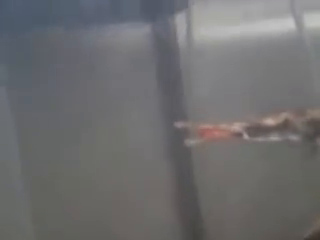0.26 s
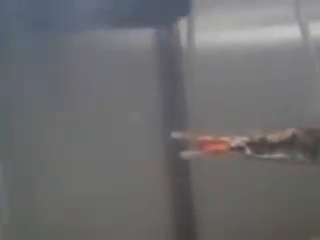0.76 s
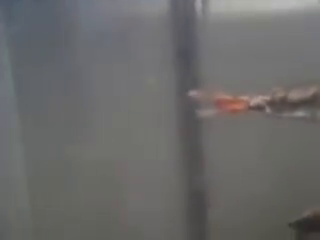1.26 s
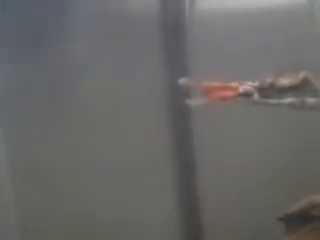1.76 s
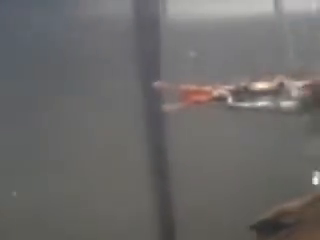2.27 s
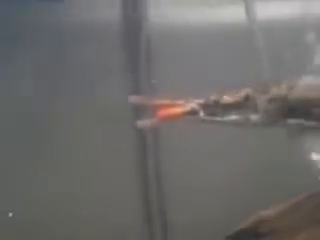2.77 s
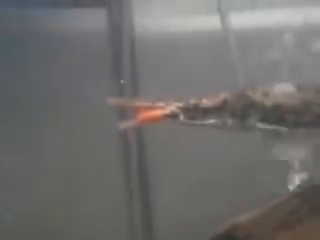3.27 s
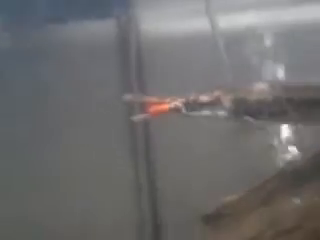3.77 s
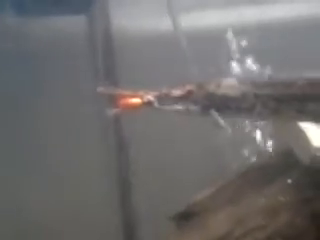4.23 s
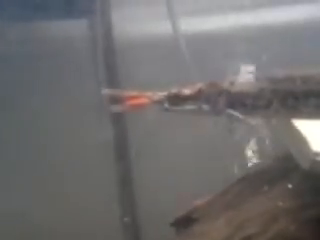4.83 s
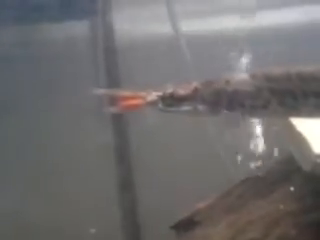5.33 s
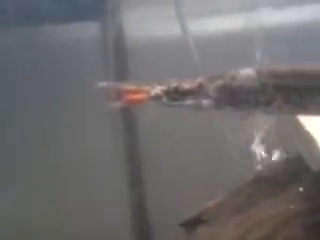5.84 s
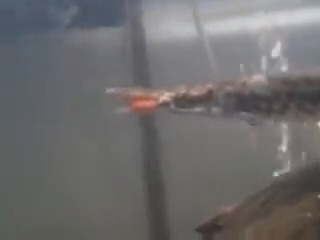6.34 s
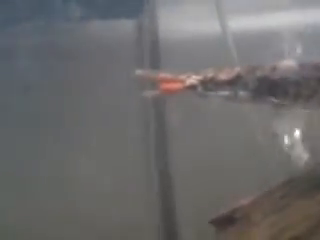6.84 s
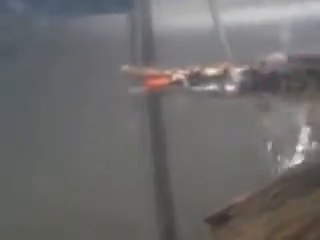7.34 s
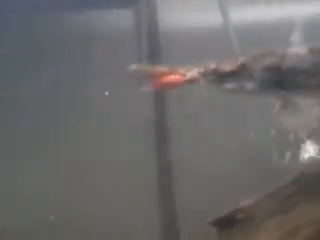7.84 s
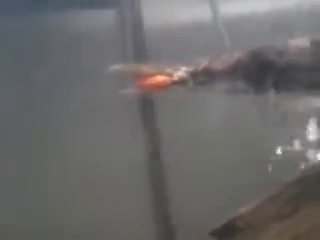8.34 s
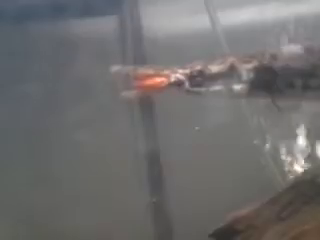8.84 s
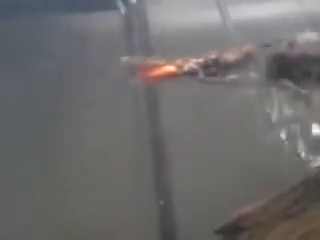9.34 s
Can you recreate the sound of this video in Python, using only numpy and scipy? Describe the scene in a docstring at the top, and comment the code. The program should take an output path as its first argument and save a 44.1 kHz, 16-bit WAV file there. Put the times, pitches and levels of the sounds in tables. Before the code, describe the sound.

Close handling noise opens: gritty finger rubbing and hard, clipped ticks on a plastic microphone casing for about one second. Bright water then trickles and bubbles into an aquarium, with rising plips and crisp little splashes over a quiet pump hum. One loud knock interrupts at about seven seconds. The small room is close and slightly reverberant; water is clearer on the left, dull and faint on the right.

```python
"""Fingers rub and tick on the plastic casing of the microphones, hard enough to overload the input.
Under them and after them filter water trickles into an aquarium in a small room: bubbles are dying
sines that climb in pitch, drops are puffs of bright noise, the stream is a fizz of small resonances.
Behind it the pump hums in mains harmonics over filtered-noise rumble.
The water is nearer the left microphone; the hand shades the right one."""
import sys
import numpy as np
from scipy import signal
from scipy.fft import rfft, irfft
from scipy.io import wavfile

SR = 44100
rng = np.random.default_rng(int(sys.argv[2]) if len(sys.argv) > 2 else 0)


def int16_out(signal):
    """Quantize to a 16-bit WAV file."""
    q = np.round(np.clip(np.atleast_2d(signal).T, -1, 1) * 32767)
    wavfile.write(sys.argv[1], SR, q.astype(np.int16))


N = 423360


def from_db(db):
    """Amplitude gain of a level in dB."""
    return 10 ** (np.asarray(db) / 20)


def rms_one(x):
    """Scale to rms 1."""
    return x / np.sqrt(np.mean(x ** 2) + 1e-20)


def in_time(rows):
    """Gain at every sample from rows of (t/s, level/dB)."""
    t_s, level_db = np.transpose(rows)
    return from_db(np.interp(np.arange(N) / SR, t_s, level_db))


def colour(x, points):
    """Filter by a spectrum of (f/Hz, level/dB), interpolated over log frequency."""
    f_hz, level_db = np.transpose(points)
    log_f = np.log(np.arange(N // 2 + 1) * SR / N + 1)
    gain = from_db(np.interp(log_f, np.log(f_hz), level_db))
    return irfft(rfft(x) * gain, N)


def drift(rate_hz):
    """Noise through two equal low-pass poles at rate_hz, run at SR / 40; rms 1."""
    r = np.exp(-80 * np.pi * rate_hz / SR)
    noise = rng.standard_normal(N // 40 + 2002)
    slow = signal.lfilter([1], [1, -2 * r, r * r], noise)[2000:]   # skip the start-up
    return np.interp(np.arange(N) / 40, np.arange(len(slow)), rms_one(slow))


def ring(clicks, f_hz, t60_s):
    """Two-pole resonator: a unit click starts a dying sine of initial amplitude 1."""
    r, w = from_db(-60 / (t60_s * SR)), 2 * np.pi * f_hz / SR
    return signal.lfilter([0, np.sin(w)], [1, -2 * r * np.cos(w), r * r], clicks + 1e-18)


def add(out, t_s, sound):
    """Mix a short sound in at t_s."""
    i = int(np.clip(round(t_s * SR), 0, N))
    out[i:i + len(sound)] += sound[:N - i]


# colour of the stream at the left microphone: (f/Hz, level/dB)
STREAM_COLOUR = [(700, -4), (1200, -3), (2000, -5), (2400, -3.5), (3300, -2), (4500, 1.5), (5300, 0.5),
                 (6700, 2.5), (7200, -1.5), (7600, -5.5), (10500, -10.5), (12500, -15), (14400, -52)]


def fizz(per_s, cycles, spread_db, clump_db, register_db):
    """Small bubbles born at random in clumps; each swells and rings at one of 32 pitches."""
    excess_db = spread_db * np.minimum(rng.exponential(1, N), 4)
    kicks = from_db(excess_db) * rng.choice([-1, 1], N)
    born = rng.random(N) < per_s * from_db(clump_db * drift(7.0)) / SR
    pitches_hz, dealt = np.geomspace(800, 14300, 32), rng.integers(0, 32, N)
    swells = [from_db(register_db * drift(13.0)) for register in range(8)]   # neighbours come together
    rings = 0
    for k, f_hz in enumerate(pitches_hz):
        clicks = kicks * born * (dealt == k) * swells[k // 4]
        struck = ring(clicks, f_hz, cycles / f_hz)
        swelling = ring(struck, f_hz, cycles / f_hz)   # second pass gives the swell
        rings = rings + rms_one(swelling) * f_hz ** 0.28
    return rms_one(colour(rings, STREAM_COLOUR))


# level of the stream: (t/s, level/dB)
STREAM_LEVEL = [(0.0, -38.5), (0.7, -37.5), (1.23, -44.5), (1.49, -38.5), (1.84, -42.5), (2.54, -42),
                (4.04, -43.5), (5.75, -43.5), (6.42, -40), (7.08, -39), (7.86, -45), (8.42, -43),
                (8.74, -46), (9.04, -43.5), (9.6, -44.5)]


def stream():
    """Steady trickle: dense fizz under a slow level curve."""
    level = in_time(STREAM_LEVEL)
    return level * fizz(per_s=4500, cycles=15.0, spread_db=3.3, clump_db=4.0, register_db=3.5)


BROOD_SCATTER, SPRAY_DB_PER_OCTAVE = 0.045, 3   # pitch +/- at 2400 Hz; small bubbles bring a stronger brood
SWELL_CYCLES, FLUTTER = 3.0, 0.4   # onset; flutter rms over level as the surface shakes


def bubbles(rows, cycles, rise, scatter_s, brood_db, count):
    """Each bubble is a dying sine climbing in pitch; weaker ones of like size follow as its brood."""
    out, flutter = np.zeros(N), 1 + FLUTTER * drift(180.0)
    all_draws = rng.uniform(0, 1, (len(rows), count, 4))
    for (t_s, f_hz, level_db), draws in zip(rows, all_draws):
        follower_db = brood_db + SPRAY_DB_PER_OCTAVE * np.log2(f_hz / 2400)
        scatter = BROOD_SCATTER * (f_hz / 2400) ** 0.25   # small bubbles vary more
        for k, (turn, size, late, haste) in enumerate(draws):
            follows = k > 0
            own_hz = f_hz * (1 + follows * scatter * (2 * size - 1))
            life = cycles * (own_hz / 2400) ** -.35   # cycles to fall 20 dB; large ones are damped less
            n = np.arange(round(3 * life / own_hz * SR)) * own_hz / SR   # nominal cycles gone by
            shape = np.exp(-n / life * np.log(10)) * (1 - np.exp(-n / SWELL_CYCLES))
            climb = 2 * rise * haste
            phase = turn + n * (1 - climb / 2 + climb * n / life)
            rough = flutter[int(turn * N / 2):][:len(n)]
            tone = shape * rough * np.sin(2 * np.pi * phase)
            add(out, t_s + follows * scatter_s * late, from_db(level_db + follows * follower_db) * tone)
    return out


# bubble pitches the stream favours: (f/Hz, mean level/dB)
FAVOURED_BUBBLES = [(1100, -42.5), (1250, -47.5), (1500, -43.5), (1750, -43.5), (2000, -52), (2350, -41),
                    (2950, -38.5), (3350, -40), (3800, -32), (4300, -33), (4800, -31), (5400, -26),
                    (6100, -49), (6800, -56)]
LESSER_SPREAD_DB, SIZE_SCATTER = 4.5, 0.12   # uniform +/- in level; in pitch, as a fraction
WITH_SPATTER = .4   # share of lesser bubbles that a loud spatter drags under


def lesser_bubbles(count):
    """Rows (t/s, f/Hz, level/dB) near the favoured pitches, at a loud spatter or at random."""
    when, which, size, strength, cause = rng.uniform(0, 1, (count, 5)).T
    f_hz, mean_db = np.array(FAVOURED_BUBBLES)[(which * len(FAVOURED_BUBBLES)).astype(int)].T
    spatter_s = np.array(LOUD_SPATTERS)[(when * len(LOUD_SPATTERS)).astype(int), 0]
    t_s = np.where(cause < WITH_SPATTER, spatter_s, when * N / SR)
    own_hz = f_hz * (1 + SIZE_SCATTER * (2 * size - 1))
    return np.transpose([t_s, own_hz, mean_db + LESSER_SPREAD_DB * (2 * strength - 1)])


# loud bubbles, before swell and flutter: (t/s, f/Hz, level/dB)
LOUD_BUBBLES = [(0.025,1196,-28.5), (0.053,3740,-16.5), (0.138,3180,-17.5), (0.409,3670,-20),
                (0.476,3260,-19), (0.598,4470,-18.5), (0.686,2240,-27), (0.687,3900,-21), (0.23,3160,-29),
                (0.679,2980,-26), (0.765,1130,-32), (0.776,1114,-23.5), (1.018,2980,-23.5),
                (1.061,1350,-27), (1.077,2150,-26), (1.11,2310,-27), (1.155,2410,-19.5), (1.167,4100,-23),
                (1.172,4600,-26), (1.206,1436,-27), (1.42,2250,-26), (1.427,3060,-24.5), (1.661,1310,-31),
                (1.761,3070,-22.5), (1.917,1770,-31), (2.093,1850,-24.5), (2.095,2290,-27),
                (2.129,6860,-13.5), (2.2,4400,-23.5), (2.319,1114,-26), (2.337,2830,-35), (2.479,2180,-31),
                (2.715,2170,-29), (2.96,4170,-23.5), (2.963,2280,-31), (3.107,2370,-27), (3.146,4400,-28),
                (3.409,4670,-19), (3.484,6700,-19), (3.708,6840,-19.5), (3.731,4670,-21),
                (2.253,3910,-20.5), (2.258,1433,-25.5), (2.283,2160,-25.5), (2.315,1385,-26),
                (2.471,6150,-22), (2.856,3920,-18), (2.866,5900,-20), (2.923,1110,-27), (3.224,6940,-21),
                (3.301,4360,-16), (3.304,5080,-17), (3.413,2390,-25.5), (3.469,2340,-26), (3.499,2300,-27),
                (3.597,6500,-18.5), (3.6,2400,-20), (3.6,1540,-28), (3.626,5860,-26), (3.633,3900,-22),
                (3.68,2820,-26), (3.721,3140,-30), (3.771,1043,-26), (3.79,1060,-37), (3.826,1070,-35),
                (3.961,1230,-33), (4.893,3140,-24), (3.884,2280,-23.5), (3.946,1420,-36), (3.958,6500,-14),
                (4.001,3300,-31), (4.003,4280,-37), (4.001,5500,-23), (4.081,7060,-19), (4.388,3250,-31),
                (4.39,5250,-32), (4.53,4150,-23), (4.005,6500,-20), (4.116,2430,-26.5), (4.162,3960,-22.5),
                (4.173,5800,-18), (4.172,1820,-27.5), (4.314,2460,-24), (4.332,6940,-18), (4.349,2290,-31),
                (4.364,2490,-26.5), (4.43,4750,-28), (4.44,1720,-36), (4.603,1260,-35), (4.61,3990,-23.5),
                (4.389,4240,-21), (4.428,5400,-20), (4.537,6600,-19), (4.538,5400,-17), (4.621,3770,-20.5),
                (4.629,2880,-19), (4.673,2160,-22.5), (4.811,6900,-18), (4.964,1695,-32),
                (4.967,3200,-24.5), (5.041,4230,-22), (5.054,2360,-28), (5.147,5400,-19), (5.15,3900,-21),
                (5.451,6500,-12), (5.494,1470,-36), (5.515,2330,-32), (5.574,1134,-31.5), (5.659,2900,-35),
                (5.68,2400,-29), (5.699,1690,-36.5), (5.711,3240,-28), (5.789,1665,-36), (5.881,2900,-30),
                (5.891,2200,-34), (6.144,2850,-26), (6.165,1340,-34), (6.352,4800,-20), (6.453,1680,-32.5),
                (5.773,4050,-21), (5.851,2290,-25.5), (5.992,2320,-24.5), (6.08,5420,-15), (6.135,1600,-33),
                (6.183,1206,-33), (6.247,2370,-27), (6.298,6400,-19), (6.336,2310,-22.5), (6.494,2350,-23),
                (6.515,4360,-19.5), (6.621,2500,-26.5), (6.699,1500,-33.5), (6.841,5300,-18.5),
                (6.856,2170,-29), (6.893,2900,-21.5), (6.993,4860,-14), (6.993,6660,-16.5),
                (7.217,2330,-26), (7.266,2500,-36), (7.32,1640,-23), (7.335,2320,-20), (7.503,2870,-22),
                (7.529,1700,-34), (7.61,2380,-27.5), (7.634,3160,-26), (7.703,6650,-19), (7.743,6400,-17),
                (7.741,4770,-24), (7.742,3420,-17), (7.856,1740,-30.5), (7.951,2210,-25), (7.999,7000,-16),
                (8.212,6700,-19), (8.212,5800,-17), (8.219,1600,-28), (8.278,1690,-28), (8.275,4340,-23),
                (8.353,3880,-23), (8.383,2360,-22.5), (8.41,1820,-35), (8.489,6160,-21), (8.505,1800,-28),
                (8.505,2350,-31), (8.74,6070,-19), (8.98,2400,-30), (9.077,2340,-31), (9.112,1880,-30),
                (9.17,3460,-25), (9.226,3680,-25), (9.244,2900,-26), (9.307,1750,-32), (9.334,1520,-35),
                (9.379,2280,-29), (9.394,1760,-37), (8.992,5700,-21), (9.08,5230,-27), (9.1,4800,-23),
                (9.19,6800,-28), (9.38,5130,-32), (9.469,6500,-25), (9.401,1087,-31), (9.157,2440,-25.5),
                (9.17,1125,-30.5), (9.326,2280,-28.5), (9.438,1145,-28.5), (1.103, 1340, -31),
                (1.174, 1440, -31), (1.17, 3000, -23), (1.217, 2860, -38), (1.218, 2270, -30),
                (1.329, 2320, -30), (1.427, 3500, -28), (1.487, 2350, -37), (1.509, 1086, -34),
                (1.567, 2210, -30.5), (1.629, 1820, -34), (1.629, 2170, -33), (1.631, 1410, -31),
                (1.656, 2240, -31), (1.695, 1264, -33), (1.767, 2380, -32), (1.782, 1084, -35),
                (1.809, 3150, -35), (1.844, 2400, -37), (1.863, 2910, -40), (1.93, 2250, -35),
                (2.421, 1100, -32.5), (2.494, 2250, -31), (2.574, 1686, -31), (2.586, 2990, -30),
                (2.632, 2300, -32), (2.739, 1660, -34), (2.74, 2260, -41), (2.799, 3490, -37),
                (2.8, 1400, -36), (2.864, 2160, -33), (2.973, 1085, -34), (2.99, 1810, -32),
                (3.175, 2390, -33), (3.268, 2240, -36), (3.307, 2060, -34), (3.494, 3270, -31),
                (3.595, 3230, -28), (3.678, 2460, -29), (3.703, 2580, -41), (3.947, 2350, -31),
                (4.091, 2440, -33), (4.168, 2230, -27), (4.386, 2370, -26), (4.462, 1540, -37),
                (4.609, 2540, -30), (4.68, 2820, -29), (4.771, 1650, -34), (4.916, 3180, -31),
                (5.085, 2340, -34), (5.252, 1223, -35.5), (5.433, 2350, -31), (5.553, 2360, -36),
                (5.653, 2440, -41), (6.224, 2220, -30), (6.261, 1150, -39), (6.502, 3320, -29),
                (6.541, 2580, -28), (6.63, 3140, -26), (6.67, 1110, -31.5), (6.71, 2410, -34),
                (6.833, 1720, -35), (6.953, 1560, -34), (7.156, 2880, -26), (7.181, 2800, -35),
                (7.264, 3250, -30), (7.308, 2370, -26), (7.333, 2840, -33), (7.379, 3200, -33),
                (7.504, 2170, -31), (7.511, 3400, -26), (7.76, 2340, -27), (7.798, 3150, -33),
                (7.799, 1550, -30.5), (7.85, 2190, -36), (7.881, 2270, -28), (7.895, 1710, -33),
                (8.277, 2250, -32), (9.079, 1560, -38), (9.352, 2430, -31)]
LONE_DB = -6   # lone bubbles against the lesser ones with a brood


def plips():
    """Loud and lesser bubbles with broods, plus many lone bubbles that climb faster."""
    leaders = [*lesser_bubbles(count=260), *LOUD_BUBBLES]
    out = bubbles(leaders, cycles=23.0, rise=0.03, scatter_s=.045, brood_db=-16, count=9)
    lone = lesser_bubbles(count=2400) + [0, 0, LONE_DB]
    return out + bubbles(lone, cycles=26.0, rise=0.095, scatter_s=0, brood_db=0, count=1)


# loud spatters, before the envelope: (t/s, level/dB, centre f/Hz, sizzle re burst level/dB)
LOUD_SPATTERS = [(1.0028, -35, 9970, -14), (1.0497, -27, 9000, -25), (1.154, -33, 7800, -11),
                 (1.9167, -34, 9400, -16), (2.1288, -30.5, 7520, -16), (2.1926, -34.5, 9340, -10),
                 (2.476, -34, 9980, -16), (2.7, -38, 9100, -10), (2.7977, -33, 9800, -26),
                 (2.8691, -35, 10000, -18), (2.902, -35, 8220, -7), (3.0916, -33, 8300, -14),
                 (3.1225, -29.5, 12100, -17), (3.2208, -30.5, 7570, -12), (3.2547, -34, 9780, -14),
                 (3.3016, -30.5, 10100, -16), (3.4074, -33, 9000, -7), (3.5081, -32, 10300, -14),
                 (3.5815, -29, 8900, -8), (3.7057, -34, 9060, -19), (3.791, -30, 9790, -20),
                 (4.003, -28, 11500, -22), (4.0793, -36, 8370, -19), (4.2375, -35, 11000, -16),
                 (4.3118, -30.5, 9850, -11), (4.3871, -38, 7640, -1), (4.5089, -43, 7950, 3),
                 (4.5727, -34, 9360, -14), (4.7314, -22, 9800, -15), (4.8112, -44, 9850, -17),
                 (4.866, -32, 9650, -22), (5.1454, -33, 8800, -8), (5.3215, -31.5, 9670, -18),
                 (5.3849, -33, 9170, -7), (5.9281, -36, 9200, -12), (6.0035, -29.5, 9100, -14),
                 (6.0758, -34.5, 8070, -14), (6.5043, -24.5, 11000, -16), (6.8401, -37, 8320, -2),
                 (6.9937, -32, 9500, -12), (2.8535, -30, 5000, -3), (3.3015, -31.5, 5000, -7.5),
                 (7.951, -39, 5200, -9), (1.153, -28.5, 3800, -3.5), (7.742, -29, 3400, -16),
                 (5.042, -32.5, 5300, -3), (3.958, -28, 6560, -21), (4.0035, -21.5, 4800, -24),
                 (4.388, -33, 4300, -3), (4.426, -29, 5300, -13), (4.538, -27.5, 5900, -9),
                 (4.61, -29, 4000, -20), (6.077, -34, 5300, 1), (7.2601, -33, 8990, -5),
                 (7.4661, -38, 8370, -4), (7.5035, -31, 10500, -12), (7.742, -24, 7450, -24),
                 (7.9146, -46, 9810, -20), (7.9969, -52, 7500, -20), (8.1241, -35, 9410, -19),
                 (8.2094, -35, 9030, -12), (8.2418, -33, 9710, -14), (8.4609, -37, 9000, -3),
                 (8.605, -50, 9020, -18), (8.9797, -39, 10100, -14), (9.1009, -41, 8460, -14),
                 (9.1867, -38, 9160, -17), (9.3404, -28, 8900, -20), (9.5444, -29.5, 13000, -14)]
# lesser drops: mean centre, its +/- as a fraction, mean level
SPATTER_HZ, SPATTER_SCATTER, LESSER_SPATTER_DB = 8900, 0.13, -43.5


def spatters(decay_s, tail_s, tail_db, width, count):
    """A drop bursts on the surface: a puff of band noise, then a sizzle, longer for dull splashes."""
    out, t = np.zeros(N), np.arange(4000) / SR
    lesser = []
    for when, strength, size in rng.uniform(0, 1, (count, 3)):
        level_db = LESSER_SPATTER_DB + LESSER_SPREAD_DB * (2 * strength - 1)
        f_hz = SPATTER_HZ * (1 + SPATTER_SCATTER * (2 * size - 1))
        lesser.append((when * N / SR, level_db, f_hz, tail_db))
    burst = np.exp(-t / decay_s) * (1 - np.exp(-t / 0.00023))
    for t_s, level_db, f_hz, sizzle_db in [*lesser, *LOUD_SPATTERS]:
        sizzle = np.exp(-t / tail_s * f_hz / SPATTER_HZ) * (1 - np.exp(-t / 0.0042))
        shape = burst + from_db(sizzle_db) * sizzle
        band = signal.butter(2, [f_hz / width, min(f_hz * width, .45 * SR)], "band", fs=SR)
        noise = rms_one(signal.lfilter(*band, rng.standard_normal(4000)))
        add(out, t_s, from_db(level_db) * noise * shape)
    return out


def swell(clicks, f_hz, t60_s):
    """A cavity takes up the blow over a few cycles: the resonance applied twice, peak about 1."""
    twice = ring(ring(clicks, f_hz, t60_s), f_hz, t60_s)
    return twice * 2 * np.e * np.log(1000) / (t60_s * SR)


# ticks of the casing: (t/s, left port level/dB, port f/Hz, left knock level/dB, right knock level/dB,
# left brightness/(dB/octave), right brightness/(dB/octave))
CASING_TICKS = [(0.046, -30, 5300, -38, -28.5, -3, -8), (0.0724, -33, 5370, -17, -26, 0, -10),
                (0.083, -25, 5300, -40, -36, -6, -6), (0.247, -35, 5300, -38, -32, 3, -8),
                (0.265, -23, 5400, -38, -31, 1, 1), (0.3207, -24, 5300, -11.5, -22, -4, -6),
                (0.341, -13, 5300, -14, -11, 4, 1), (0.3447, 2, 5360, -3, -0.5, 2, 0.5),
                (0.3796, 7.5, 5200, 3.5, -6, 5, 0.5), (0.4445, -20, 5300, -12, -29.5, -1, -1),
                (0.449, -4, 5400, -15.5, -16.5, -6.5, 6), (0.4536, 11.5, 5400, -4, -19, 6.5, 3),
                (0.5, -12.5, 5300, -15.5, -19, -1, -9), (0.6308, 3.5, 5350, -11, -22, 7, -3),
                (0.6324, -17, 5300, -24, -11, 1, -8), (0.7193, -13, 5020, -22, -26, -9.5, -9),
                (0.728, -14, 4990, -26, -19.5, 1, -10), (0.8082, 6.5, 5250, -9, -3.5, -6, 0),
                (0.9042, -19, 5800, -11, -8, 11, 5.5), (0.9057, 1, 5750, -15, -6.5, 5, 4.5),
                (0.9217, -23, 6200, -22, -29, -4, -4), (0.926, -19, 6300, -21, -22, -3, 0),
                (0.9654, -6.5, 5270, -14.5, -12, 5, -7.5), (0.9666, -18, 5070, -13.5, -27, -7.5, -4),
                (1.333, -52, 5300, -18, -34, -7, -8), (7.0912, -13, 5250, -9, -18, -13, -18),
                (7.0929, 7.5, 5290, -10, -7.5, 10, 8.5)]
# cavity before the left capsule, tuned by the finger over it:
# (multiple of port f, level/dB, t60 of one resonator pass/s)
PORT_MODES = [(0.999, 4, 0.0027), (1.22, -5.5, 0.0037)]
CONTACT_HZ = 7000   # a touch is soft above this


def port():
    """Each tick rings the left cavity at a pitch of its own."""
    out, click = np.zeros(N), signal.unit_impulse(600)
    all_draws_db = rng.normal(0, 1.5, (len(CASING_TICKS), len(PORT_MODES)))
    for (t_s, port_db, port_hz, *_), draws_db in zip(CASING_TICKS, all_draws_db):
        for (multiple, mode_db, t60_s), own_db in zip(PORT_MODES, draws_db):
            level = from_db(port_db + mode_db + own_db)
            add(out, t_s, level * swell(click, multiple * port_hz, t60_s))
    return signal.lfilter(*signal.butter(2, CONTACT_HZ, fs=SR), out)


# casing modes: (f/Hz, level/dB, t60/s)
CASING_MODES = [(785, -25, 0.016), (1500, -13.5, 0.0059), (1960, -11, 0.0099), (2900, -5.5, 0.0056),
                (3770, -3.5, 0.0065), (4600, -11.5, 0.0016), (5400, -12.5, 0.0047), (6500, 2, 0.0011),
                (8260, -7.5, 0.0028), (11400, -4, 0.0014)]


def strike(levels_db, db_per_octave):
    """Every tick strikes every casing mode with a strength and sign of its own."""
    at, out = [round(row[0] * SR) for row in CASING_TICKS], np.zeros(N)
    for f_hz, mode_db, t60_s in CASING_MODES:
        clicks = np.zeros(N)
        tilt_db = db_per_octave * np.log2(f_hz / 3000)
        own_db = levels_db + mode_db + tilt_db + rng.normal(0, 1.5, len(at))
        clicks[at] = from_db(own_db) * rng.choice([-1, 1], len(at))
        out += ring(clicks, f_hz, t60_s)
    return signal.lfilter(*signal.butter(2, CONTACT_HZ, fs=SR), out)


# finger strokes past the left port: (start t/s, end t/s, first level/dB, last level/dB, centre f/Hz)
FINGER_STROKES = [(0, 0.059, -21, -41, 6750), (0.125, 0.19, -30.5, -41, 6100),
                  (0.273, 0.342, -30, -34, 5550), (0.383, 0.416, -27, -37, 5300),
                  (0.42, 0.45, -36, -45, 5600), (0.444, 0.552, -10, -40.5, 5780),
                  (0.577, 0.663, -34.5, -23, 5660), (0.671, 0.732, -31, -33, 5350),
                  (0.75, 0.788, -48.5, -36, 5160), (0.916, 0.924, -30, -31, 5630),
                  (0.965, 0.995, -25, -54, 5200)]
RUB_WIDTH, RUB_RIGHT_DB = 1.13, -23   # left band edge over centre; right level re left


def rubbing():
    """Skin sticks and slips: gritty noise, narrow at the left port, faint and broad via casing on the right."""
    out = np.zeros((2, N))
    grit = rng.standard_normal((2, N)) * from_db(0.89 * drift(137.0))
    for start_s, end_s, first_db, last_db, f_hz in FINGER_STROKES:
        i, n = max(round(start_s * SR), 0), round((end_s - start_s) * SR)
        shape = from_db(np.linspace(first_db, last_db, n)) * signal.windows.tukey(n, .15)
        left_band, right_band = [f_hz / RUB_WIDTH, f_hz * RUB_WIDTH], [650, 4900]
        for side, edges_hz, level_db in ((0, left_band, 0), (1, right_band, RUB_RIGHT_DB)):
            band = signal.butter(2, edges_hz, "band", fs=SR, output="sos")
            noise = rms_one(signal.sosfilt(band, grit[side, i:i + n]))
            out[side, i:i + n] += from_db(level_db) * shape * noise
    return out


# soft bumps of the hand, before onset and decay:
# (t/s, left level/dB, right level/dB, f/Hz, decay to 1/e /cycles)
HAND_BUMPS = [(0.145, -15, -62, 151, 0.61), (0.454, -31, -55, 105, 1.2), (1.331, -19, -60, 160, 0.58),
              (2.806, -8, -40, 110, .15), (.908, -15, -38, 600, 1.4), (7.0914, -19, -24, 110, 0.13),
              (7.0915, 5, -10, 604, 0.37)]


def hand():
    """Ticks, rubbing and bumps carried through the casing; bumps are short dying sines."""
    _, _, _, left_db, right_db, bright_left, bright_right = np.transpose(CASING_TICKS)
    ticks = [port() + strike(left_db, bright_left), strike(right_db, bright_right)]
    no_bass = signal.butter(3, 500, "high", fs=SR)   # a small casing passes no bass
    out = rubbing() + signal.lfilter(*no_bass, ticks)
    for t_s, left_db, right_db, f_hz, decay_cycles in HAND_BUMPS:
        n = np.arange(3000) * f_hz / SR   # cycles gone by
        bump = np.sin(2 * np.pi * n) * np.exp(-n / decay_cycles) * (1 - np.exp(-n / 1.36))
        for side, level_db in zip(out, (left_db, right_db)):
            add(side, t_s, from_db(level_db) * bump)
    return out


# pump hum: (multiple of mains f, left level/dB rms, right level/dB rms), before waver
HUM_LINES = [(2, -67.5, -80.5), (3, -72, -72), (4, -60.5, -78), (5, -46.5, -57.5), (6, -47, -74.5),
             (7, -59.5, -93), (8, -60.5, -83), (9, -50, -63.5), (10, -51.5, -70), (11, -55.5, -63.5),
             (18, -61, -76)]
# pump and cabinet rumble, relative spectra: (f/Hz, level/dB)
RUMBLE_LEFT_COLOUR = [(30, -34), (80, -16.5), (130, -16.5), (220, -2), (270, -6), (330, 0.5), (390, -9),
                      (430, 1), (500, 1), (560, -4.5), (630, 3.5), (700, -8), (780, -10.5), (960, -10),
                      (1075, -1.5), (1190, -17), (2200, -23.5)]
RUMBLE_RIGHT_COLOUR = [(30, -14), (80, -22), (130, -16), (220, -13), (330, -15), (430, -12), (650, -34),
                       (780, -27), (960, -38), (1075, -16), (1190, -31), (2200, -39)]
MAINS_HZ, RUMBLE_DB, RUMBLE_OPPOSED = 60.03, -43, 0.46   # left rms before throb; anti-phase share


def pump():
    """Wavering mains harmonics over rumble that throbs with the coil; opposed and late on the right."""
    turn = 2 * np.pi * MAINS_HZ * np.arange(N) / SR + 0.046 * drift(1.0)
    out = np.zeros((2, N))
    for multiple, left_db, right_db in HUM_LINES:
        line = np.sqrt(2) * np.sin(multiple * turn + rng.normal(0, 0.9))   # loosely in step
        levels = from_db([[left_db], [right_db]]) * [[1], [-1]]
        out += line * from_db(1.7 * drift(4.0)) * levels
    near, far = rng.standard_normal((2, N))
    share = np.clip(RUMBLE_OPPOSED, 0, 1)
    opposed = np.sqrt(1 - share ** 2) * far - share * near
    rumble = np.array([colour(near, RUMBLE_LEFT_COLOUR), colour(opposed, RUMBLE_RIGHT_COLOUR)])
    throb = (1 + 0.2 * np.cos(turn)) * from_db(1.2 * drift(5.0))
    out += from_db(RUMBLE_DB) * rumble / np.std(rumble[0]) * throb
    return np.array([out[0], np.roll(out[1], shift=9)])


# shading of the right microphone by the hand: (f/Hz, level/dB)
HAND_SHADE = [(700, -9), (1500, -15.5), (2400, -17), (3000, -14.5), (4000, -21.5), (5400, -19.5),
              (6900, -26), (9000, -26), (14000, -22)]
ROOM_T60_S, ROOM_DB = 0.37, -1.5   # tail energy re left direct path


def room(x):
    """Direct path plus a dying-noise tail, separate for each capsule; the right one is shaded."""
    t = np.arange(round(.4 * SR)) / SR
    tails = rng.standard_normal((2, len(t))) * np.clip(t / 0.00053, 0, 1)
    tails *= from_db(-60 * t / ROOM_T60_S) + from_db(1.5 - 60 * t / .06)   # close glass answers first
    tails *= from_db(ROOM_DB) / np.linalg.norm(tails, axis=1, keepdims=True)
    tails[0, 29], tails[1, 0] = 1, .4   # direct path: later but stronger on the left
    left, right = signal.fftconvolve(x[None], tails, axes=1)[:, :N]
    return np.array([left, colour(right, HAND_SHADE)])


def scene():
    """Water through the room; pump and hand reach the capsules directly."""
    water = stream() + plips()
    water += spatters(decay_s=0.0028, tail_s=0.018, tail_db=-26.0, width=1.4, count=300)
    return room(water) + pump() + hand()


HISS_DB, CUTOFF_HZ = -86, 15300   # hiss rms before filters; stopband edge


def record(dry):
    """Input hiss, hard clipping near full scale, then bass and top cut."""
    hiss = from_db(HISS_DB) * rng.standard_normal(dry.shape)
    clipped = np.clip(dry + hiss, -.95, .95)
    coupled = signal.lfilter(*signal.butter(1, 85, "high", fs=SR), clipped)
    return signal.sosfilt(signal.cheby2(14, 55, CUTOFF_HZ, fs=SR, output="sos"), coupled)


dry = scene()
out = record(dry)
int16_out(out)
```